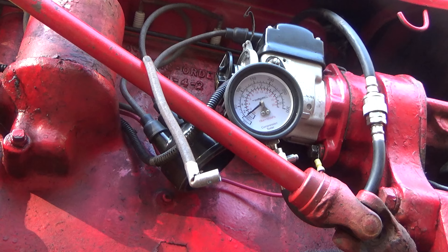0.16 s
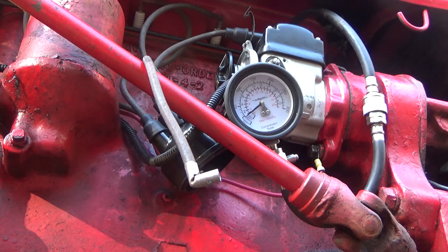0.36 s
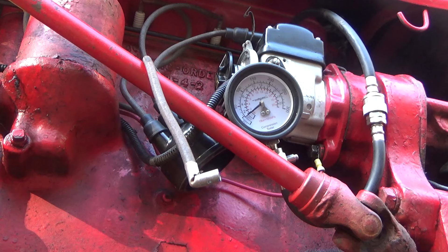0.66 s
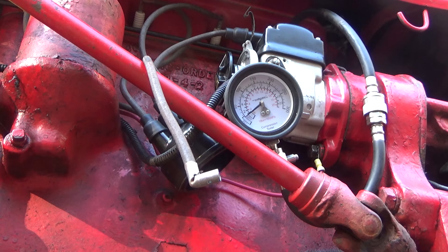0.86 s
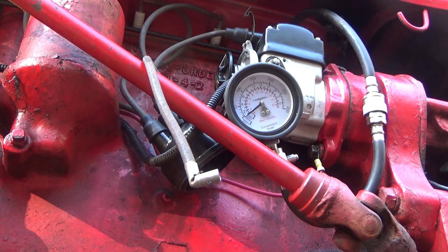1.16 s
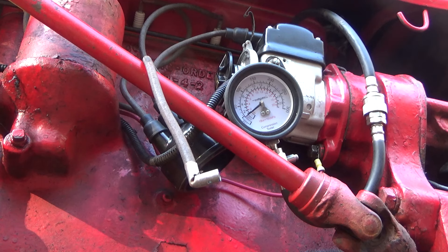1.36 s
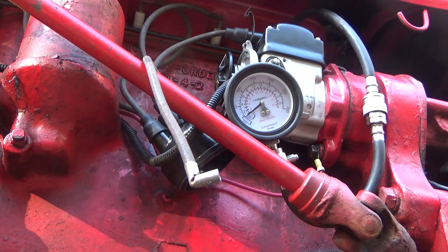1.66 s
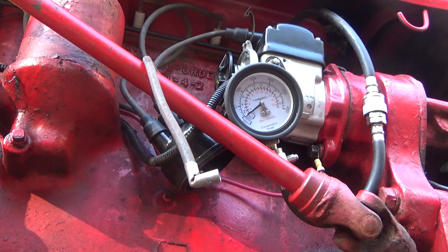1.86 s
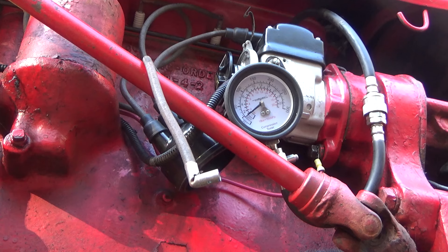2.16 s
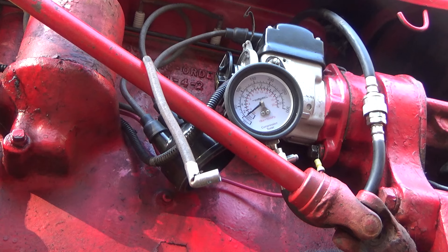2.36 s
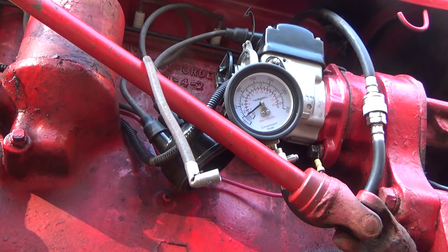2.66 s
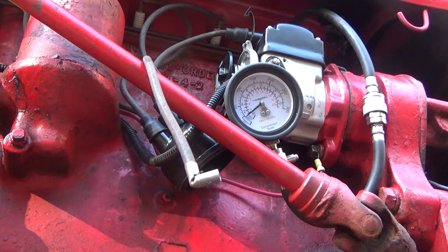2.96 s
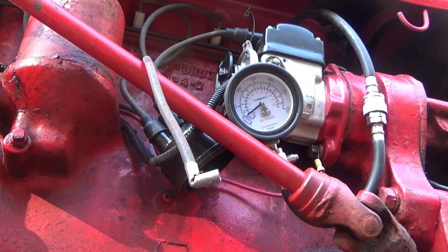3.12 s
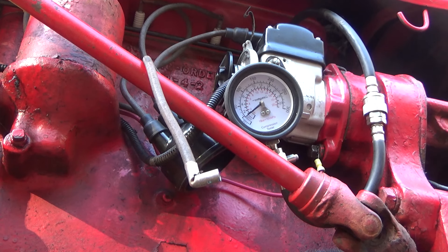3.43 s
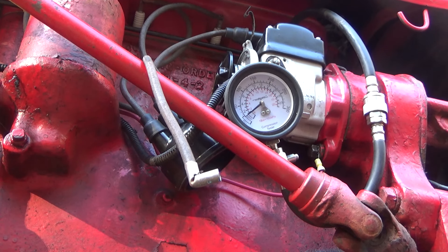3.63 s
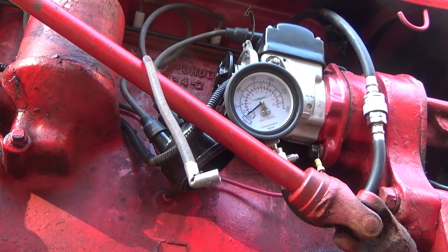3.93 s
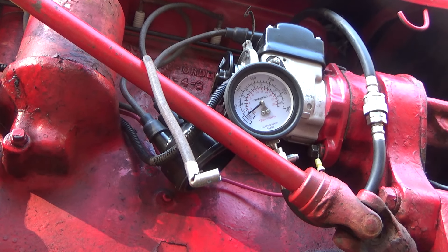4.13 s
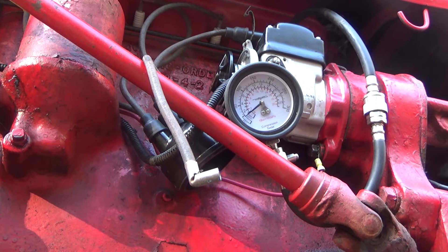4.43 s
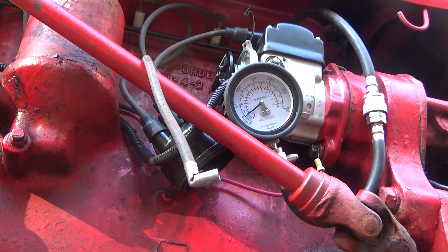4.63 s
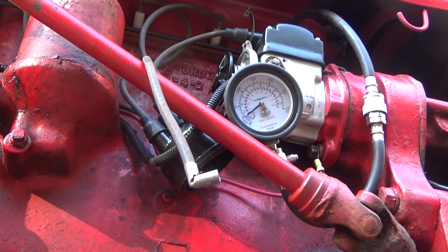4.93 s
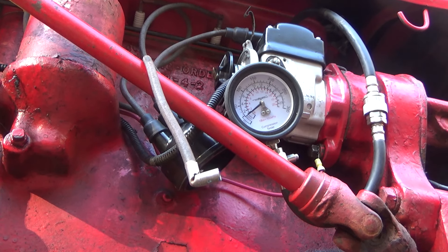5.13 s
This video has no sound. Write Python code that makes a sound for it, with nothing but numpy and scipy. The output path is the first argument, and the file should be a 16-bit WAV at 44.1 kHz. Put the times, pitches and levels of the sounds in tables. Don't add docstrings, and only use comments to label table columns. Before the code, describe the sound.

In a quiet workshop, engine parts tick and squeak softly before loud metallic ratchet clacks and low iron knocks break out twice.

```python
import sys
import numpy as np
from scipy import signal
from scipy.fft import rfft, irfft, next_fast_len
from scipy.io import wavfile
from scipy.ndimage import map_coordinates

SR = 44100
rng = np.random.default_rng(int(sys.argv[2]) if len(sys.argv) > 2 else 0)


def level_to_linear(level):
    exponent = np.asarray(level, float) / 20
    return 10 ** exponent


def wav_record(signal):
    frames = np.transpose(np.atleast_2d(signal))
    bounded = np.clip(frames, -1, 1)
    quanta = np.round(bounded * 32767).astype(np.int16)
    wavfile.write(sys.argv[1], SR, quanta)


N = 233112
CLOCK = np.arange(N) / SR


def unit(x):
    return x / np.sqrt(np.mean(x ** 2) + 1e-20)


def along(points, hz):
    f, v = np.transpose(points)
    return np.interp(np.log(hz + 1), np.log(f + 1), v)


def curve(points):
    s, db = np.transpose(points)
    return level_to_linear(np.interp(CLOCK, s, db, left=-200, right=-200))


def peaks(times_s, levels_db, rise, fall):
    late_s = CLOCK - np.reshape(times_s, (-1, 1))
    slope_db = np.where(late_s < 0, -rise * late_s, fall * late_s)
    return level_to_linear(np.max(np.reshape(levels_db, (-1, 1)) - slope_db, axis=0))


def wobble(rate_hz):
    knots = rng.standard_normal(int(N * rate_hz / SR) + 4)
    return map_coordinates(knots, [CLOCK * rate_hz])


def filtered(x, response):
    m = next_fast_len(N + SR // 2)
    return irfft(rfft(x, m) * response(np.fft.rfftfreq(m, 1 / SR)), m)[..., :N]


def resonances(modes):
    def response(f):
        total = 0
        for k, (hz, width_hz, db) in enumerate(modes):
            total = total + (-1) ** k * level_to_linear(db) * 1j * f * width_hz / (hz * hz - f * f + 1j * f * width_hz)
        return total
    return response


def grit(rate_hz, spread_db, smooth):
    size_db = np.minimum(spread_db * rng.exponential(size=N), 9)
    slips = (rng.random(N) < rate_hz / SR) * level_to_linear(size_db) * np.sign(rng.standard_normal(N))
    return unit(slips) + smooth * rng.standard_normal(N)


def rush(spectrum, alike):
    def shape(hz):
        turn = np.arccos(np.clip(along(alike, hz), -1, 1)) / 2
        return level_to_linear(along(spectrum, hz)) * [np.cos(turn), np.sin(turn)]
    mid, side = filtered(rng.standard_normal((2, N)), shape)
    return unit(np.array([mid + side, mid - side]))


# (time [s], level [dB])
SHOP_STIR = [
    (0.0, -60),
    (1.35, -53.5),
    (2.16, -57.5),
    (3.39, -48),
    (4.09, -52.5),
    (4.81, -58.5),
    (5.29, -55),
]
# (frequency [Hz], density [dB per Hz])
DRONE_HUM = [(97, -67), (165, -4), (172, -12.5), (191, -11), (215, 0.5), (319, 2), (349, -3.5), (392, -0.5),
             (411, -1.5), (432, -3.5), (456, -16), (573, -16), (659, -19.5), (700, -31), (910, -69),
             (1540, -120)]
DEEP_RUMBLE = [(11, -50), (18, -12.5), (49, -8), (65, 1), (86, -6), (121, 3), (150, -2.5), (170, -23),
               (220, -40), (370, -120)]
AIR_HISS = [(290, -34), (500, -2.5), (650, -74), (709, -13), (857, -13), (1020, -13), (1560, -13.5),
            (2210, -15.5), (14000, -27), (16200, -26.5)]
# (frequency [Hz], correlation)
LIKENESS = [(60, 1), (130, 0.99), (290, 0.99), (640, 0.72), (1410, -0.0), (3100, 0.3), (6820, 0.58),
            (15000, 1.0)]


def workshop():
    stir = curve(SHOP_STIR)
    jolt_s, boom_db, _ = np.transpose(CRANK_JOLTS)
    drone_echo = peaks(jolt_s, boom_db - 14.5, rise=310, fall=54)
    drone = np.hypot(stir, drone_echo) * level_to_linear(1.0 + 1.5 * wobble(7)) * rush(DRONE_HUM, LIKENESS)
    rumble_echo = peaks(FRAME_S, -42, rise=130, fall=50)
    rumble_gain = np.hypot(level_to_linear(-22) * stir ** 0.75, rumble_echo)
    rumble = rumble_gain * level_to_linear(2.5) * rush(DEEP_RUMBLE, LIKENESS)
    hiss = level_to_linear(-64.5) * rush([(420, -55)] + AIR_HISS[1:], LIKENESS)
    return drone + rumble + hiss


# (time [s], rubbing level [dB])
CRANK_TURN = [(0.6, -92), (1.1, -77), (1.276, -72), (1.47, -73.5), (2.3, -81.5), (2.556, -67), (2.722, -58),
              (3.096, -62.5), (3.324, -67.5), (3.44, -51), (3.63, -51), (3.7, -39), (3.834, -55),
              (4.22, -59), (4.43, -52.5), (4.562, -63), (4.8, -58), (5.04, -62.5)]
# (time [s], level [dB])
RING_PUFFS = [
    (.75, -59.5),
    (2.1, -64),
    (2.25, -59.5),
    (2.72, -50.5),
    (4.0, -51),
    (4.3, -50.5),
    (4.36, -62),
]
# (frequency [Hz], density [dB per Hz])
GRIND_COLOUR = [(260, -0.5), (450, 6.5), (775, 3), (1060, 2.5), (1340, -3), (1590, -0.5), (2370, -6.5),
                (5000, -11.5), (6500, -33), (11000, -120)]
LEAK_COLOUR = [(2350, -6.5), (4000, -6.5), (5760, -4.5), (7930, -2), (8070, 1.5), (11200, -8), (15100, -22),
               (16000, -10)]


def pistons():
    grind = curve(CRANK_TURN)
    puffs = peaks(*np.transpose(RING_PUFFS), rise=150, fall=120)
    hiss = np.hypot(level_to_linear(-21.5) * grind ** 0.56, puffs)
    rub = unit(filtered(grit(300, spread_db=4.0, smooth=1.5), lambda f: level_to_linear(along(GRIND_COLOUR, f))))
    leak = unit(filtered(grit(270, spread_db=30.0, smooth=3.7), lambda f: level_to_linear(along(LEAK_COLOUR, f))))
    rub_flutter_db, leak_flutter_db = 1.2 * wobble(25), 1.2 * wobble(30)
    return grind * level_to_linear(-0.5 + rub_flutter_db) * rub + hiss * level_to_linear(-8.0 + leak_flutter_db) * leak


def struck(rows, kind):
    mid_db, per_heft, top_db, per_force = kind
    soft_db = -50
    return [(s, db, heft_db, mid_db + per_heft * heft_db, top_db - per_force * (db - soft_db), t60_s)
            for s, db, heft_db, t60_s in rows]


# (frequency [Hz], level [dB], t60 [s])
STEEL_MODES = [(1530, 6, .3), (2186, 1, .3), (2850, 2.5, .3), (3136, 3, 0.11), (3480, 2, .3), (3420, 1, .3),
               (3860, 4, 0.26), (5100, 0, 0.12), (5980, 0.5, 0.18), (7000, -9.5, 0.073), (7960, 0.5, .1),
               (7700, 0, .1), (8800, -5, 0.13), (9090, -18, 0.16)]
# (frequency [Hz], level [dB])
CONTACT_COLOUR = [(120, 11), (500, 1.5), (1200, -0.5), (2400, 0.5), (3500, -0.5), (4600, -2.5), (6600, -1.5),
                  (8400, 1.5), (9500, -5), (11500, 2.5), (15000, -5)]


def contacts(table, trim_db, ring_db, crack, edge_hz, sizzle):
    edges_hz = [(edge_hz, 9600), (450, 2000), (2000, edge_hz), (10000, 14500)]
    bands = [signal.butter(4, e, "band", fs=SR, output="sos") for e in edges_hz]
    linger = [0.62, 1.57, 1.23, sizzle]
    swell_s = [0.00026, 0.0023, 0.0011, 0.00027]
    out, t = np.zeros(N + SR), np.arange(SR // 5) / SR
    for s, db, low_db, mid_db, air_db, t60_s in table:
        t60_s = max(t60_s, 0.005)
        rebounds = np.interp(t * 450, np.arange(100), rng.standard_normal(100))
        chatter = level_to_linear(2.4 * rebounds)
        sound = 0
        levels_db = (0, low_db, mid_db, air_db)
        for band, rel_db, k, rise_s, (lo, hi) in zip(bands, levels_db, linger, swell_s, edges_hz):
            fade = level_to_linear(-60 * t / (k * t60_s)) * (1 - np.exp(-t / rise_s)) * chatter
            fade = fade + 0.2 * level_to_linear(-60 * t / 0.01)
            width = np.sqrt(SR / 2 / (hi - lo))
            snap = (t == 0) * crack * width * min(1, lo / 4500)
            blow = rng.standard_normal(len(t)) * fade + snap
            sound = sound + level_to_linear(rel_db) * signal.sosfilt(band, blow) * width
        for hz, level_db, life_s in STEEL_MODES:
            low = hz < 4500
            strength_db = level_db + ring_db + (mid_db if low else 0) + rng.normal(0, 3)
            drift = np.cumsum(rng.normal(0, 0.06, len(t)))
            onset = 1 - np.exp(-t / (0.01 if low else 1e-4))
            decay = level_to_linear(strength_db - 60 * t / min(life_s, t60_s))
            sound = sound + decay * np.sin(2 * np.pi * hz * t + drift) * onset
        out[round(s * SR):][:len(t)] += level_to_linear(db + trim_db) * sound
    return filtered(out[:N], lambda f: level_to_linear(along(CONTACT_COLOUR, f)))


# (time [s], peak [dB], heft [dB], t60 [s])
GEAR_TICKS = [(0.8293, -62, 19.5, 0.021), (0.9889, -64.5, 12.5, 0.055), (1.0661, -29, -16, 0.045),
              (1.0734, -42, 7.5, 0.017), (1.2551, -39.5, 0, 0.021), (1.2793, -39, -3, 0.012),
              (1.3185, -47, 0, 0.02), (1.351, -37.5, -27, 0.011), (1.4587, -53, -2, 0.041),
              (2.4347, -53.5, 4.5, 0.044), (2.4596, -53.5, 7, 0.025), (2.5616, -53, 0, 0.038),
              (2.5809, -56.5, 5, 0.26), (2.757, -65, 5.5, .02), (2.9136, -22.5, 0, 0.027),
              (3.0305, -57, 22.5, 0.042), (4.3859, -27.5, -1.5, 0.042), (4.5444, -55, 10.5, 0.028),
              (4.5832, -47, -7, 0.021), (4.6633, -45.5, 8.5, 0.012)]
SPRING_FLICKS = [(1.096, -48.5, -21, 0.043), (1.2032, -59, -16, .03), (1.2195, -46, -22, .008),
                 (1.2508, -53, -17, .008), (1.325, -51, -8, .01), (1.337, -51, -13, .007),
                 (1.341, -51, -8, .007), (1.343, -51, -8, .008), (1.355, -48, -10, .012),
                 (1.361, -54, -10, .008), (1.379, -51, 2, .012), (1.4035, -55, -10, .007),
                 (1.4168, -51, -13, .008), (1.419, -54, -13, .008), (2.7105, -47, -15, 0.043),
                 (2.9894, -48, 8, 0.047), (3.8323, -44.5, 10, 0.033), (4.0361, -41.5, -3, 0.042),
                 (4.522, -46.5, -21, 0.048), (4.8342, -49, -20, .04), (4.881, -45.5, -24, .04),
                 (5.2343, -21, -32, 0.033)]
COVER_TAPS = [
    (1.1794, -64.5, 14.5, .03),
    (2.8146, -55, 16.5, 0.04),
    (2.9294, -33, 7.5, 0.019),
    (3.359, -48, 4, 0.028),
    (3.6514, -31.5, 12, 0.18),
    (3.8596, -39.5, 14, 0.0089),
    (4.3994, -48, 18, 0.025),
    (4.6194, -45, 10, 0.015),
]
# (2-5 kHz level [dB], growth [dB per dB heft], top level [dB], loss [dB per dB force])
TICK_COLOUR = (1, 0.7334, -9, 0.74)
FLICK_COLOUR = (-3, 0, -0.5, 0.04)
TAP_COLOUR = (-52, 2.5, -4, .3)


def ticking():
    light = struck(GEAR_TICKS, TICK_COLOUR) + struck(COVER_TAPS, TAP_COLOUR)
    light += struck(SPRING_FLICKS, FLICK_COLOUR)
    return contacts(light, trim_db=-7.5, ring_db=-14, crack=2.07, edge_hz=6560, sizzle=0.65)


# (start [s], end [s], frequency [Hz], level [dB], pitch unsteadiness [0-1])
JOINT_SQUEAKS = [(1.065, 1.135, 12300, -73, .001), (1.4, 1.9, 1700, -80, .03), (2.65, 2.69, 1880, -64, .01),
                 (2.711, 2.73, 1880, -60, .008), (2.722, 2.75, 1890, -64, .01),
                 (2.72, 2.78, 7720, -64, .001), (3.685, 3.722, 6930, -54, .014),
                 (3.633, 3.644, 5850, -48, .004), (3.85, 3.92, 3865, -68.5, .03),
                 (3.955, 4.05, 3760, -66, .035), (3.935, 3.995, 1745, -63.5, .02),
                 (3.985, 4.05, 1740, -58, .018), (4.055, 4.11, 1745, -64.5, .025),
                 (4.1, 4.26, 1740, -66.5, .018), (4.25, 4.34, 1750, -60.5, .016),
                 (4.33, 4.43, 1750, -59.5, .016), (4.27, 4.38, 3750, -69, .03),
                 (3.96, 3.98, 2700, -65, .01), (4.045, 4.33, 7693, -65, .004),
                 (4.32, 4.385, 7685, -68, .004)]
# (start [s], end [s], first [Hz], last [Hz], level [dB])
JOINT_CHIRPS = [
    (4.935, 4.972, 2330, 2290, -67),
    (4.976, 5.004, 2610, 2730, -62.5),
    (4.996, 5.042, 2730, 2580, -58.5),
]
# (multiple, level [dB])
CHIRP_OVERTONES = [(1, 0), (2, -7), (3, -14)]


def squeaks():
    out = np.zeros(N)
    notes = [(a, b, hz, hz, db, shake) for a, b, hz, db, shake in JOINT_SQUEAKS]
    for a, b, first_hz, last_hz, db in JOINT_CHIRPS:
        notes += [(a, b, k * first_hz, k * last_hz, db + rel_db, 0.006) for k, rel_db in CHIRP_OVERTONES]
    for start, end, first_hz, last_hz, db, shake in notes:
        gate = np.clip(np.minimum(CLOCK - start, end - CLOCK) / 0.008, 0, 1)
        hz = np.interp(CLOCK, [start, end], [first_hz, last_hz]) * (1 + shake * wobble(150))
        level = level_to_linear(db + 3 + (1.8 + 15 * shake) * wobble(60))
        out += gate * level * np.sin(2 * np.pi * np.cumsum(hz) / SR)
    return out


# (time [s], peak [dB], frequency [Hz])
PART_PINGS = [(1.075, -45, 2190), (1.075, -48, 600), (1.352, -42.5, 2000), (1.284, -55, 1080),
              (1.46, -60, 4630), (2.46, -49, 1285), (2.562, -46.5, 1330), (2.61, -46, 1270),
              (2.78, -44.5, 1060), (2.815, -47, 1700), (2.914, -27.5, 614), (2.99, -56, 13000),
              (2.999, -40.5, 1040), (3.587, -31, 7000), (3.629, -47, 5670), (3.832, -28.5, 650),
              (3.832, -33.5, 10440), (3.836, -46, 6100), (3.858, -29, 664), (3.86, -35, 9100),
              (4.037, -57, 12900), (4.387, -34, 2350), (4.524, -53, 8300), (4.584, -45, 8900),
              (3.466, -28, 980), (3.638, -26, 2600), (3.662, -17, 4870), (4.388, -36, 3210),
              (4.395, -42, 790), (5.058, -30.5, 1100), (5.0962, -12, 5100), (5.1092, -14.5, 8570),
              (3.512, -22, 8450), (2.592, -54, 990)]
# (time [s], peak [dB], frequency [Hz], t60 [s]) # further notes, mostly short dry snaps
DRY_SNAPS = [(1.351, -33, 3480, 0.0056), (1.351, -38, 6300, .005), (1.3525, -41, 4240, .01),
             (1.258, -52, 4900, .01), (2.5822, -39, 3000, 0.0077), (2.582, -42, 3540, .02),
             (2.68, -52, 1000, .015), (2.689, -48, 1300, .01), (2.701, -47, 1250, .01),
             (2.756, -48, 2800, .006), (2.778, -51, 4500, .006), (2.791, -51, 950, .02),
             (3.476, -18, 4900, .015), (3.6628, -10.5, 1590, 0.0092), (3.667, -17, 1430, 0.012),
             (5.084, -22, 2240, 0.016), (5.0845, -26, 1500, .012), (5.057, -45, 2400, .03),
             (4.038, -47, 7700, 0.042), (3.434, -46, 14500, .006), (3.467, -38, 14500, .006),
             (3.4765, -33, 13500, .01), (5.066, -42, 14500, .006), (5.074, -33, 15000, .01),
             (1.2195, -42, 11000, .004), (1.2795, -38.5, 8300, 0.013), (3.4985, -19, 8600, 0.011),
             (5.0955, -13.5, 3500, 0.017), (5.11, -27, 3280, .07), (5.2345, -19.5, 5500, 0.0088),
             (5.2345, -31, 6400, .006), (5.2705, -23, 6100, .008), (5.114, -19, 3600, .06),
             (4.6635, -44, 1240, .01)]
LONG_RINGS = [(2.611, -47, 283, .2), (3.105, -38, 392, 0.12), (3.155, -48.5, 446, 0.11),
              (3.287, -35.5, 264, 0.26), (3.288, -42.5, 151.5, 0.31), (3.5, -25, 1530, 0.15),
              (3.515, -31, 2300, 0.07), (3.548, -26, 291, 0.15), (3.612, -32, 404, 0.12),
              (3.576, -16, 380, 0.085), (3.589, -22, 293, 0.1), (3.643, -17, 264, 0.17),
              (3.661, -20, 303, 0.056), (3.7, -34.5, 203, 0.87), (3.8, -43.5, 362.5, 0.68),
              (3.676, -19.5, 1204, 0.097), (3.695, -30.5, 900, 0.064), (3.702, -26, 253, 0.17),
              (3.789, -30, 268, 0.16), (3.512, -46, 13900, 0.11), (5.11, -44, 13900, 0.086),
              (5.134, -32, 4070, 0.085), (5.121, -36.5, 297.6, 0.43), (5.138, -35, 382, 0.14),
              (5.178, -29, 278.3, 0.31), (5.175, -35, 7450, 0.037), (5.201, -42, 950, .09),
              (5.203, -51, 4850, .12), (5.2, -36.5, 2850, 0.11), (5.27, -33, 1620, 0.09),
              (5.272, -25, 3670, .08)]
SHELL_NOTES = [
    (3.478, -23, 3566, 0.086),
    (3.485, -21, 3740, 0.063),
    (3.485, -26, 6020, 0.067),
    (3.501, -15.5, 3500, 0.048),
    (3.501, -23, 2850, 0.045),
    (3.512, -25, 3060, 0.11),
    (3.516, -23, 3900, 0.064),
    (3.635, -28, 2490, 0.13),
    (3.64, -39, 4000, .05),
    (3.662, -30, 6900, 0.12),
]


def pings():
    t60_at_1khz_s, damping = 0.024, 0.24
    notes = [(s, db, hz, t60_at_1khz_s * (1000 / hz) ** damping) for s, db, hz in PART_PINGS]
    out, t = np.zeros(N + SR), np.arange(SR // 5) / SR
    for s, db, hz, t60_s in notes + LONG_RINGS + DRY_SNAPS + SHELL_NOTES:
        pair = np.sin(2 * np.pi * hz * 0.995 * t) + 0.3 * np.sin(2 * np.pi * hz * 1.03 * t)
        onset = 1 - np.exp(-t * hz / 0.33)
        out[round(s * SR):][:len(t)] += level_to_linear(db - 60 * t / t60_s) * onset * pair
    return out[:N]


# (frequency [Hz], width [Hz], level [dB])
HOUSING_MODES = [(587, 83, 6), (985, 180, 0.5), (1330, 110, -1), (1700, 14, 0), (1822, 75, 0),
                 (2090, 110, -1), (2350, 120, -5.5), (2730, 63, -11), (3180, 160, -11.5), (3640, 60, -15)]


def shunt():
    gain = peaks(3.2855, -35.5, rise=8600, fall=234)
    knocks = grit(700, spread_db=-6.0, smooth=0.45)
    body = lambda f: resonances(HOUSING_MODES)(f) + 0.14 / (1 + 1j * f / 1200) ** 2
    return gain * unit(filtered(knocks, body))


# (time [s], boom [dB], knock over boom [dB])
CRANK_JOLTS = [(3.294, -45, -5), (3.311, -38, -1.5), (3.49, -44.5, 15.5), (3.525, -37.5, 10),
               (3.551, -19, -20), (3.563, -15.5, -15.5), (3.577, -16.5, -12.5), (3.596, -28, -5),
               (3.612, -28, -3), (3.647, -18, -7), (3.662, -20, -14), (3.684, -26.5, -1), (3.706, -32.5, 5),
               (3.722, -29.5, -1), (3.75, -25.5, -16), (3.78, -36, -19), (3.835, -31, -12.5),
               (3.949, -48, -15), (5.098, -50, 17), (5.133, -31, -5), (5.156, -27.5, -6.5),
               (5.182, -34, -20), (5.202, -30, -1), (5.244, -30.5, -6.5), (5.286, -29, -18)]
# (frequency [Hz], width [Hz], level [dB])
BLOCK_MODES = [(76, 34, -5), (136, 27, -12), (203, 8.6, -4), (224.4, 13, -5), (263.7, 21, 6), (362, 9.1, 4),
               (411, 13.7, 7)]
CASE_MODES = [(624, 194, -2.5), (584, 43, 5.5), (694, 150, -2), (902, 47, 6.5), (1046, 33, 5.5),
              (1162, 59, 0.5), (1620, 270, -2.5)]


def block():
    s, boom_db, knock_db = np.transpose(CRANK_JOLTS)
    boom = peaks(s, boom_db, rise=1500, fall=280)
    knock = peaks(s, boom_db + knock_db, rise=500, fall=300)
    soft = lambda f: (1j * f / (65 + 1j * f)) ** 4 / (1 + 1j * f / 600)
    lumps = grit(250, spread_db=-3.0, smooth=0.047)
    low = unit(filtered(lumps, lambda f: resonances(BLOCK_MODES)(f) * soft(f)))
    case = unit(filtered(grit(600, spread_db=-19.0, smooth=0.99), resonances(CASE_MODES)))
    return boom * level_to_linear(-9.0) * low + knock * level_to_linear(-5.5) * case


# (time [s], peak [dB], heft [dB], t60 [s])
COUPLING_CLACKS = [(3.4338, -30.5, 0.5, 0.048), (3.4565, -36, 14, 0.074), (3.4615, -43, 9, 0.06),
                   (3.467, -14.5, -13, 0.042), (3.4764, -9, -14, 0.24), (3.4982, -10, -7, 0.14),
                   (3.5118, -13, -13, 0.12), (3.5852, -33, 4, 0.083), (3.6267, -53.5, 31, 0.37),
                   (3.6335, -44.5, 21, 0.043), (3.6395, -41.5, 26.5, 0.067), (3.6602, -23, 11.5, 0.08),
                   (3.6628, -25.5, 11.5, 0.027), (3.6654, -22.5, 7.5, 0.069), (5.038, -39.5, 13, 0.045),
                   (5.0545, -45.5, 17, 0.1), (5.0595, -39, 10, 0.072), (5.0658, -22.5, 1, 0.068),
                   (5.0736, -6.5, -25, 0.086), (5.0764, -13, -7.5, 0.093), (5.0788, -13, -2.5, 0.11),
                   (5.0815, -17, -7, 0.1), (5.0954, -12, -9, 0.16), (5.109, -12.5, -7, 0.13),
                   (5.1736, -27.5, -3.5, 0.068), (5.1991, -42, 15.5, 0.12), (5.2345, -25.5, 0.5, 0.073),
                   (5.2703, -21, 7, 0.036)]
# (2-5 kHz level [dB], growth [dB per dB heft], top level [dB], loss [dB per dB force])
CLACK_COLOUR = (7, 0.69, -9, 0.5)
# (frequency [Hz], level [dB])
SHELL_COLOUR = [(1300, -1.5), (3500, 1.5), (4400, 0), (5100, -1.5), (6600, -1), (8500, 1.5), (14200, 3.5),
                (15200, -2)]


def coupling():
    clacks = contacts(struck(COUPLING_CLACKS, CLACK_COLOUR), trim_db=-13.5, ring_db=-10.0, crack=4.455,
                      edge_hz=6170, sizzle=0.77)
    return filtered(clacks, lambda f: level_to_linear(along(SHELL_COLOUR, f)))


FRAME_S = 3.654
# (frequency [Hz], width [Hz], level [dB])
FRAME_MODES = [(188.2, 21, -0.31), (207.7, 11.4, -2.2)]


def frame():
    gain = peaks(FRAME_S, -37.5, rise=110, fall=50)
    shaking = grit(250, spread_db=-5.0, smooth=0.59)
    return gain * unit(filtered(shaking, lambda f: resonances(FRAME_MODES)(f) ** 2))


# (frequency [Hz], t60 [s])
SHOP_T60 = [(300, 0.67), (1500, 0.24), (4000, 0.033), (9000, 0.067), (15000, 0.036)]
# (frequency [Hz], level [dB])
SHOP_ANSWER = [(100, -49), (300, -26), (700, -17), (1300, -14), (4000, -7), (8000, -8), (13000, -16)]


def walls(x):
    hz, t, z = signal.stft(rng.standard_normal((2, SR // 2)), SR, nperseg=256)
    fade = level_to_linear(-60 * t / along(SHOP_T60, hz)[:, None])
    tail = signal.istft(z * fade, SR, nperseg=256)[1]
    tail = tail / np.linalg.norm(tail[0])
    wet = signal.fftconvolve(np.pad(x, (200, 0))[None], tail, axes=1)[:, :N]
    return filtered(wet, lambda f: level_to_linear(along(SHOP_ANSWER, f)))


# (frequency [Hz], phase [rad per side])
EAR_LAG = [(20, .1), (150, .3), (1200, .33), (2500, .17), (4000, .05), (16000, .03)]


def scene():
    small = ticking() + coupling() + pings() + pistons() + squeaks()
    casting = block() + shunt() + frame()
    lead = lambda f: np.exp(1j * np.array([[-1], [1]]) * along(EAR_LAG, f))
    direct = small * level_to_linear([[-0.2], [0.2]]) + casting * level_to_linear([[-0.3], [0.3]])
    return filtered(direct, lead) + walls(small + casting) + workshop()


def top_cut(x):
    return signal.sosfilt(signal.butter(12, 16480, fs=SR, output="sos"), x)


def record(dry):
    top_hz = 15750
    heard = filtered(dry, lambda f: np.where(f < top_hz, 1, level_to_linear(-28)))
    return top_cut(heard)


dry = scene()
out = record(dry)
wav_record(out)
```